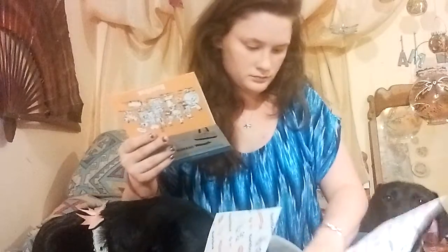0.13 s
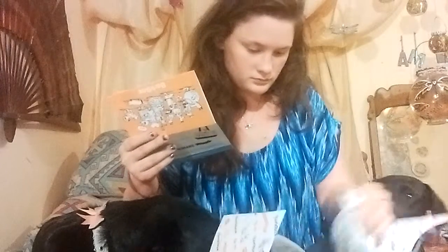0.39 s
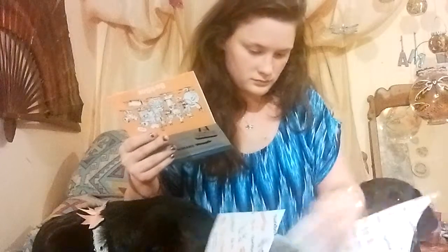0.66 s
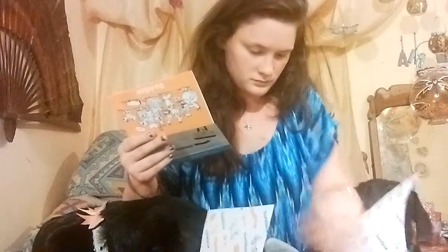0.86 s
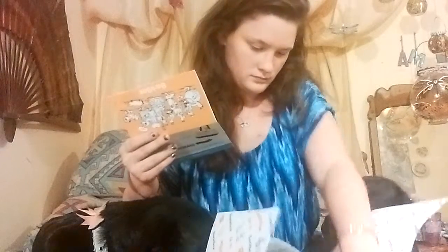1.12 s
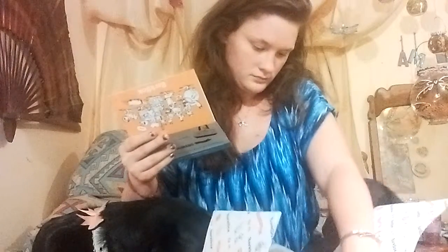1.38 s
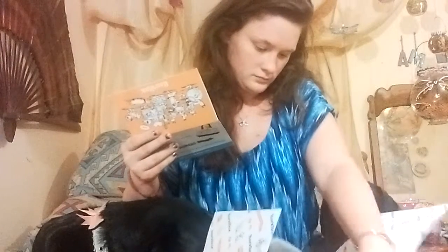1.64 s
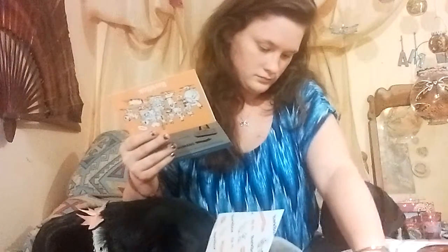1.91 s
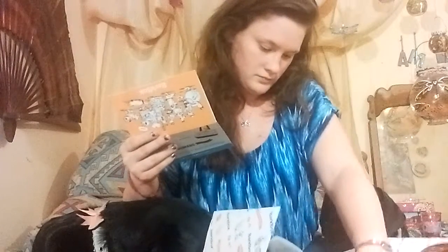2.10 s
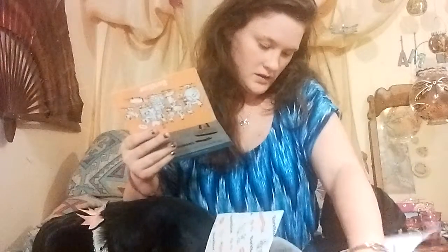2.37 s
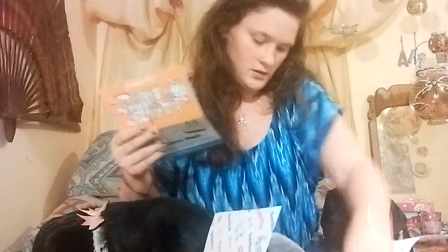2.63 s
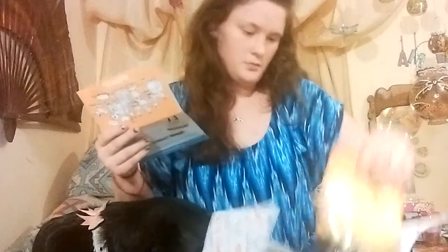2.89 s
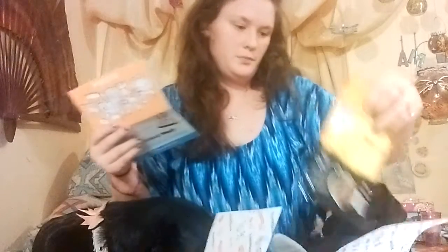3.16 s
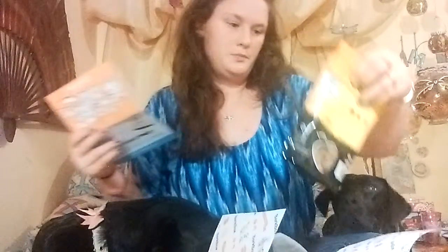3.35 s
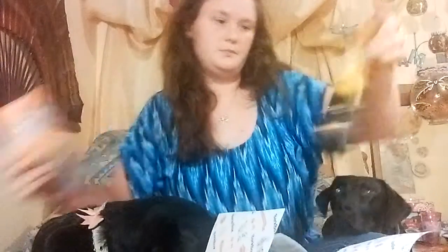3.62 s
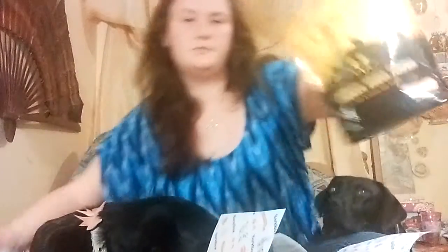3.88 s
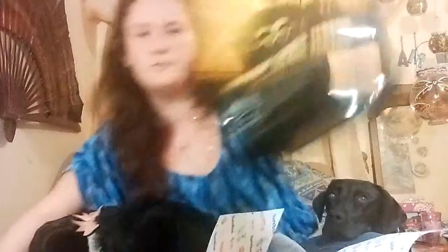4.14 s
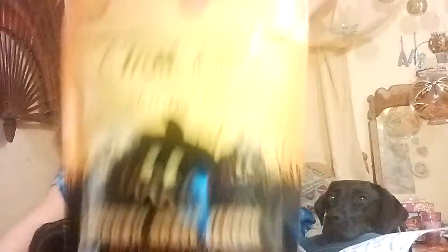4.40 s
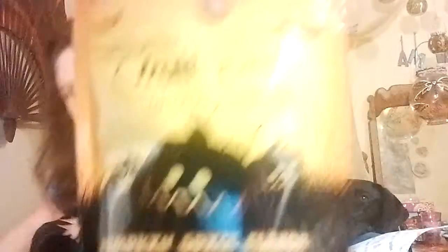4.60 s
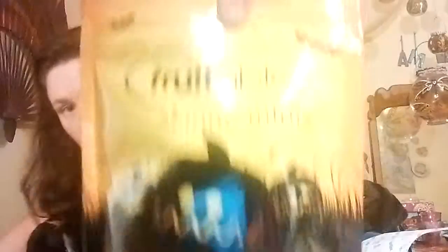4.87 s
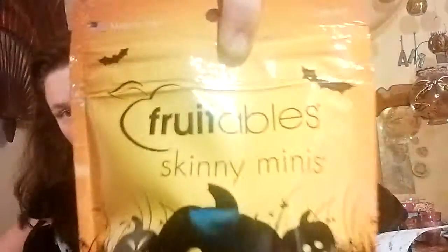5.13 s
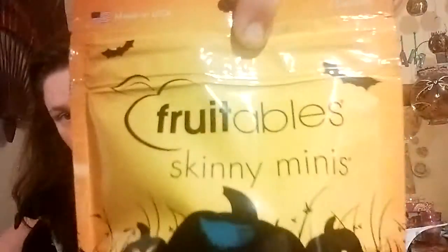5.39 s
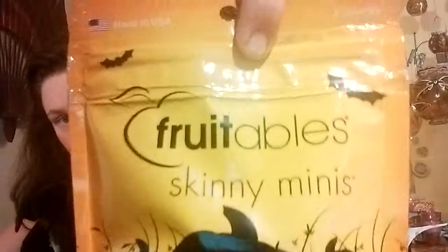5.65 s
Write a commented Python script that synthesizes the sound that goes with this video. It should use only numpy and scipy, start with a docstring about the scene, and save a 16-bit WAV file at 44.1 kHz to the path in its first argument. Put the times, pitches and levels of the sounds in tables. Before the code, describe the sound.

In a small, soft, quiet room, close to the microphone, stiff paper snaps and rustles as a hand rummages in a cardboard box. A sparser lull follows, then a dense crackle and dull thud as a plastic pouch is lifted out. A few sharp plastic clicks come later, then near silence with a throbbing low hum and a short airy hiss.

```python
"""Creases snap, singly and in dense rustles, as a hand rummages among stiff paper in a cardboard box, lifts out
a plastic pouch and turns it in a small soft room: band noise under burst envelopes, plus ringing facets and cracks.
The box answers with dull knocks from struck modes; a mains hum of low harmonics throbs below; a thin high hiss of
coloured noise with a faint whine comes near the end. A level-dependent gain makes quiet tails stop short."""
import sys
import numpy as np
from scipy import signal
from scipy.io import wavfile
from scipy.ndimage import uniform_filter1d

SR = 44100
rng = np.random.default_rng(int(sys.argv[2]) if len(sys.argv) > 2 else 0)


def store_wav(level_fs):
    """Save 16-bit WAV to argv[1]."""
    pcm = np.round(np.clip(np.atleast_2d(level_fs), -1, 1) * 32767)
    wavfile.write(sys.argv[1], SR, pcm.T.astype(np.int16))


def voltage_ratio(level):
    """Linear amplitude factor for a level in decibels (scalar or array-like)."""
    return 10 ** (np.asarray(level, float) / 20)


N = 253676

# centres of the knock, middle and treble zones of the handling sounds: f/Hz
ZONES_HZ = [500, 1600, 7000]
EDGES_HZ = 30 * 2 ** np.arange(0, 9.4, 1 / 3)   # third-octave bands
CENTRES_HZ = np.sqrt(EDGES_HZ[1:] * EDGES_HZ[:-1])


def rms_one(x):
    """Normalisation: a signal divided by its root mean square has unit power."""
    return x / np.sqrt(np.mean(x ** 2) + 1e-20)


def in_time(spans, silent_db=-120):
    """Linear interpolation of curve tables at every sample; the first column is silent between tables."""
    t = np.arange(N) / SR
    s, *columns = np.transpose([row for span in spans for row in span])
    columns = [np.interp(t, s, c) for c in columns]
    inside = sum((t >= span[0][0]) & (t <= span[-1][0]) for span in spans) > 0
    return [np.where(inside, columns[0], silent_db)] + columns[1:]


def at_hz(points, hz):
    """Spectral interpolation: a table is read on a log-frequency axis."""
    return np.interp(np.log(hz), np.log(np.array(points)[:, 0]), np.array(points)[:, 1])


def band(x, k):
    """Band-pass filtering: only third-octave band k is kept."""
    return signal.sosfilt(signal.butter(2, EDGES_HZ[k:k + 2], "band", fs=SR, output="sos"), x + 1e-18)


def drift(rate):
    """Slow random modulation: straight lines join normal draws of spread 1, rate of them per second."""
    steps = rng.standard_normal(int(N / SR * rate) + 2)
    return np.interp(np.arange(N) / SR * rate, np.arange(len(steps)), steps)


def dying(clicks, t60):
    """Exponential decay: a one-pole filter turns each click into an envelope."""
    return signal.lfilter([1], [1, -voltage_ratio(-60 / (t60 * SR))], clicks + 1e-18)


def random_ticks(per_s, spread_db):
    """Poisson-like excitation: clicks fall at random, a few much stronger than the rest."""
    strength_db = spread_db * np.minimum(rng.exponential(1, N), 4)
    return (rng.random(N) < per_s / SR) * voltage_ratio(strength_db)


def ring(clicks, hz, t60):
    """Modal resonance: a two-pole filter answers a unit click with a decaying sine of height 1."""
    r = voltage_ratio(-60 / (t60 * SR))
    w = 2 * np.pi * hz / SR
    return signal.lfilter([0, np.sin(w)], [1, -2 * r * np.cos(w), r * r], clicks + 1e-18)


def coloured(spectrum, patchy_db):
    """Filtered noise: white noise is shaped band by band, each band flickering on its own; rms 1."""
    white = rng.standard_normal((2, N))
    out = 0
    for k, hz in enumerate(CENTRES_HZ):
        gain = voltage_ratio(at_hz(spectrum, hz) + patchy_db * drift(60))
        out = out + gain * band(white[k % 2], k)   # neighbours use different noise
    return rms_one(out)


def in_zones(zones_db):
    """Spectral envelope: three zone levels are spread over all bands, then tilted."""
    # the middle hands over to the treble in a step between these two: f/Hz
    step_hz = [3700, 4700]
    # tilt shared by all handling noise: f/Hz, level/dB
    tilt = [(60, -33.5), (150, -19), (300, -11.5), (600, -4.5), (1500, -1.5), (3000, -1.5), (6000, -3.5),
            (9000, -9), (16000, -16.5)]
    treble_below, treble_above = 0.3, 0.96   # treble shares at the two ends of the step
    knock, middle, treble = np.eye(len(ZONES_HZ))
    below = (1 - treble_below) * middle + treble_below * treble
    above = (1 - treble_above) * middle + treble_above * treble
    shares = [knock, middle, below, above, treble]
    knots_hz = ZONES_HZ[:2] + step_hz + ZONES_HZ[2:]
    spread = np.transpose([np.interp(np.log(CENTRES_HZ), np.log(knots_hz), one) for one in np.transpose(shares)])
    return spread @ zones_db + at_hz(tilt, CENTRES_HZ)[:, None]


def snap_envelope(t, peak_db, t60):
    """Transient envelope: a short faint swell leads into each snap, which has a short hard head and then decays."""
    lead_db, lead_db_per_s = -18.5, 1494.5
    head_db, head_t60_s, head_follows = 1.5, 0.0038, 0.14   # louder bursts: harder heads, dB per dB over -20 dB
    rise_share = 0.047   # rise time as a share of t60
    rise = 1 - (1 - voltage_ratio(lead_db)) * np.exp(-t.clip(0) / (rise_share * t60))
    body = voltage_ratio(-60 * t / t60) * rise
    head = voltage_ratio(head_db + head_follows * (peak_db + 20) - 60 * t / head_t60_s)
    lead = voltage_ratio(lead_db + lead_db_per_s * t.clip(max=0))
    return np.where(t < 0, lead, body + head)


def scuff_envelope(t, t60, swell_s=0.0079):
    """Gradual onset: a scuff swells in a straight line before it dies."""
    fall = (t - swell_s).clip(0) ** 2 / (t60 * (t.clip(0) + swell_s))
    return (t / swell_s).clip(0, 1) * voltage_ratio(-60 * fall)


def snaps(per_s=1000.0, spread_db=4.0, tick_s=0.003, tick_share=0.56, scatter_db=3.0, box_db=-35.5):
    """Crackling noise: ticks over dense crackle follow burst and rustle envelopes; the low part rings box modes."""
    # Levels below are before the tilt and the scatter of the bands.
    # single bursts of creases: t/s, peak 1-3.5 kHz level/dB, knock 250-900 Hz level/dB,
    # treble 4-14 kHz level/dB, t60/s
    single_bursts = [(0.0014, -26.5, -48, -43, 0.053), (0.0157, -25, -42.5, -34, 0.048),
                     (0.0515, -26, -36.5, -33, 0.07), (0.0848, -35.5, -39, -42.5, 0.07),
                     (0.1063, -32, -41.5, -37, 0.07), (0.126, -21.5, -35, -26, 0.05),
                     (0.143, -9, -17, -15, 0.11), (0.2548, -39, -37, -73, 0.07),
                     (0.2879, -24, -36, -23.5, 0.09), (0.382, -21.5, -28.5, -24.5, 0.064),
                     (0.434, -23, -30, -24, 0.14), (0.4599, -18.5, -40, -23, 0.084),
                     (0.608, -43, -68, -58, 0.062), (0.686, -38.5, -55, -39.5, 0.2),
                     (0.718, -30, -51, -36.5, 0.1), (0.8023, -17, -32, -26.5, 0.19),
                     (0.8458, -18.5, -23.5, -40, 0.077), (0.8798, -25.5, -32.5, -51, 0.097),
                     (0.897, -23.5, -55, -42, 0.047), (0.9488, -31, -50.5, -75, 0.056),
                     (1.129, -78.5, -50.5, -51.5, 0.068), (1.2137, -32.5, -47.5, -56, 0.063),
                     (1.6485, -25.5, -28, -26, 0.085), (1.739, -28.5, -37.5, -39.5, 0.078),
                     (1.7705, -32.5, -39, -52, 0.07), (1.799, -16, -30.5, -22, 0.08),
                     (2.099, -40, -66, -78, 0.05), (2.174, -37.5, -46, -67, 0.053),
                     (2.417, -31, -47, -83, 0.084), (2.4777, -13.5, -27.5, -27.5, 0.089),
                     (2.516, -24, -45.5, -34, 0.048), (2.562, -27, -33, -47, 0.12),
                     (2.6205, -21.5, -68, -36, 0.059), (2.6564, -27, -45, -52, 0.07),
                     (2.6839, -17.5, -32, -44, 0.07), (2.709, -20, -34, -32, 0.09),
                     (2.7507, -21.5, -40, -22.5, 0.085), (2.7826, -30.5, -46.5, -27, 0.09),
                     (2.814, -32.5, -33.5, -56, 0.07), (2.8879, -19, -15.5, -52.5, 0.046),
                     (2.9196, -16.5, -32, -35.5, 0.1), (2.9342, -18.5, -30.5, -16, 0.086),
                     (2.949, -27, -9, -33, 0.071), (2.9759, -14.5, -16, -46, 0.07),
                     (2.9914, -17, -21, -27.5, 0.1), (3.0179, -19, -17.5, -21, 0.15),
                     (3.1134, -35.5, -53, -38.5, 0.07), (3.1386, -36, -50.5, -46.5, 0.055),
                     (3.6803, -20, -48, -17.5, 0.089), (3.9954, -20, -30, -25.5, 0.063),
                     (4.0985, -25, -38.5, -64, 0.03), (4.114, -27, -44.5, -51.5, 0.023),
                     (4.125, -26.5, -35.5, -42, 0.04), (4.15, -19.5, -37, -46, 0.023),
                     (4.1863, -17.5, -34, -24.5, 0.05), (4.29, -46, -63, -67, 0.12),
                     (4.3802, -32, -70, -45, 0.026), (4.4154, -47, -80.5, -66, 0.02),
                     (4.429, -87, -85, -49, 0.03), (4.6038, -38.5, -41, -51, 0.03),
                     (4.98, -51, -80.5, -94.5, 0.2), (5.223, -47.5, -80.5, -91, 0.049)]
    # softer scuffs, same columns: t/s, peak level/dB, knock level/dB, treble level/dB, t60/s
    soft_scuffs = [(1.303, -40.5, -47.5, -54.5, 0.028), (1.476, -39, -44.5, -64.5, 0.036),
                   (1.53, -35, -45, -55.5, 0.033), (1.594, -35.5, -37.5, -76, 0.032),
                   (2.029, -34.5, -40.5, -58, 0.12), (2.141, -43, -40.5, -66, 0.058),
                   (2.235, -38, -40.5, -48.5, 0.036), (3.835, -36, -65, -47.5, 0.041)]
    # steady rustle while the hand moves, one list per stretch: t/s, middle 1-3.5 kHz level/dB,
    # knock 250-900 Hz level/dB, treble 4-14 kHz level/dB
    rustle_curves = [
        [(0.0, -35.5, -40.5, -57), (0.142, -47, -50, -41), (0.31, -45, -44, -58), (0.37, -56, -70, -68),
         (0.44, -45, -44, -31), (0.5, -32, -63, -64)],
        [(0.5, -49, -41, -71), (0.548, -51.5, -64, -51.5), (0.63, -55.5, -73.5, -60), (0.67, -75, -77.5, -67),
         (0.804, -48, -41.5, -47.5), (0.98, -81, -84, -94)],
        [(1.1, -72, -79.5, -87.5), (1.194, -99.5, -60, -80), (1.5, -93.5, -65, -87.5)],
        [(1.5, -80, -67, -90), (1.554, -96, -75, -61), (1.666, -67, -60, -70), (1.856, -74.5, -43, -70),
         (1.95, -102, -73, -69)],
        [(1.95, -94, -59, -78.5), (2.112, -101, -86, -67), (2.3, -60, -75.5, -67), (2.4, -98, -70, -70.5)],
        [(2.46, -49, -57, -76), (2.524, -55, -76, -71), (2.646, -41.5, -56, -59), (2.894, -47.5, -42.5, -58.5),
         (2.97, -33, -36, -66), (3.17, -90, -79, -82)],
    ]
    # modes of the box: f/Hz, relative level/dB, t60/s
    box_modes = [(278, -16.5, 0.089), (410, 0, 0.08), (563.2, 5.5, 0.15), (800, -4, 0.019),
                 (1037, -2.5, 0.033)]
    crest_db, clump_db = 8.5, 5   # burst peak over rms; spread of the rustle's clumping

    power = np.zeros((len(CENTRES_HZ), N + SR))
    middle_db, knock_db, treble_db = in_time(rustle_curves)
    moving = (middle_db > -119) * voltage_ratio(clump_db * drift(45))
    power[:, :N] = (moving * voltage_ratio(in_zones([knock_db, middle_db, treble_db]))) ** 2

    t = np.arange(-SR // 20, int(SR * .3)) / SR   # from 0.05 s before each burst
    for k, (s, peak_db, knock_db, treble_db, t60) in enumerate(single_bursts + soft_scuffs):
        at = round((s + t[0]) * SR)
        colour_db = in_zones([[knock_db], [peak_db - crest_db], [treble_db]])[:, 0]
        colour_db = colour_db + scatter_db * rng.standard_normal(len(CENTRES_HZ))
        if k < len(single_bursts):
            shape = snap_envelope(t, peak_db, t60)
        else:
            shape = scuff_envelope(t, t60)
        shape = shape[max(-at, 0):]
        power[:, max(at, 0):at + len(t)] += np.outer(voltage_ratio(colour_db), shape) ** 2

    ticks = rms_one(dying(random_ticks(per_s, spread_db), tick_s))
    grit = np.sqrt(1 - tick_share + tick_share * ticks ** 2)
    drive = rng.standard_normal((2, N)) * grit
    burst = 0
    for k, hz in enumerate(CENTRES_HZ):
        even = np.sqrt(.36 * SR / hz)   # evens out the band widths
        burst = burst + band(drive[k % 2] * np.sqrt(power[k, :N]), k) * even
    knock = drive[0] * np.sqrt(power[np.searchsorted(CENTRES_HZ, ZONES_HZ[0]), :N])
    box = sum(voltage_ratio(box_db + mode_db) * ring(knock, hz, t60) for hz, mode_db, t60 in box_modes)
    return burst + facets(power) + box


def facets(power, per_s=3500.0, cycles=37.0, spread_db=3.5, level_db=-4.5):
    """Plate resonance: each tick rings one flat facet between the creases, at a pitch of its own."""
    ticks = random_ticks(per_s, spread_db)
    pitches = np.geomspace(400, 9000, 40) * (1 + .03 * rng.standard_normal(40))
    dealt = rng.integers(0, 40, N)   # which facet a tick strikes
    out = 0
    for k, hz in enumerate(pitches):
        strength = np.sqrt(power[np.searchsorted(EDGES_HZ, hz) - 1, :N])
        out = out + ring(ticks * (dealt == k) * strength, hz, cycles / hz) * np.sqrt(hz / 2000)
    return voltage_ratio(level_db) * out


def room(x, wet_db=-8.5, cut_s=0.066, rise_s=0.00064, trace_db=-8.0):
    """Diffuse reverberation: noise in each band follows the sound's power, dies away and soon drops to a trace."""
    # reverberation time: f/Hz, t60/s
    reverb_times = [(200, 0.048), (1000, 0.22), (4000, 0.26), (12000, 0.079)]
    white, out = rng.standard_normal((2, N)), 0
    t = np.arange(SR // 5) / SR
    for k, hz in enumerate(CENTRES_HZ):
        decay = voltage_ratio(-120 * t / at_hz(reverb_times, hz))   # of power, hence the doubled 60 dB
        decay = decay * np.clip(1.5 - t / cut_s, voltage_ratio(2 * trace_db), 1) * (1 - np.exp(-t / rise_s))
        power = signal.fftconvolve(band(x, k) ** 2, decay / decay.sum())[:N]
        out = out + np.sqrt(power.clip(0)) * rms_one(band(white[k % 2], k))
    return voltage_ratio(wet_db) * out


def gate(x, low_db=-63.5, middle_db=-60.5, treble_db=-62.0, slope=0.92, depth_db=13.0, window_s=0.0042):
    """Downward expansion: the recorder's suppressor pushes down what falls under a threshold in each of three bands."""
    low = signal.sosfiltfilt(signal.butter(2, 1000, fs=SR, output="sos"), x)
    treble = signal.sosfiltfilt(signal.butter(2, 4000, "high", fs=SR, output="sos"), x)
    out = 0
    for part, threshold_db in ((low, low_db), (x - low - treble, middle_db), (treble, treble_db)):
        level_db = 10 * np.log10(uniform_filter1d(part ** 2, int(window_s * SR)).clip(1e-14))
        out = out + part * voltage_ratio(-np.clip(slope * (threshold_db - level_db), 0, depth_db))
    return out


def suppressor(x, open_db=8.5, threshold_db=-58.0, window_s=0.06):
    """Level-dependent gain: the background opens a little while handling is loud."""
    level_db = 10 * np.log10(uniform_filter1d(x ** 2, int(window_s * SR)).clip(1e-14))
    return voltage_ratio(open_db / (1 + np.exp((threshold_db - level_db) / 6.4)))


def background(handled, floor_db=-76):
    """Stationary noise floor: coloured noise under the suppressor's gain."""
    # spectral density of the floor: f/Hz, relative level/dB per Hz
    floor_colour = [(15, -27), (25, 0), (53, -29.5), (123, -12), (195, -18.5), (427, -17), (4030, -31.5),
                    (9570, -30), (16000, -34)]
    return voltage_ratio(floor_db) * coloured(floor_colour, patchy_db=2.0) * suppressor(handled)


def hum(before_db=-70.5, before_half_s=0.026, after_s=0.066, after_db=-64.5, swell_s=0.0067,
        rest_db=-81.0, buzz_db=-28.5, rumble_db=-24.5):
    """Amplitude modulation: a tone near twice the mains rate throbs, with weak swells before and after each throb."""
    # one row per throb: level/dB, half length/s
    throbs = [(-51.5, 0.019), (-52, 0.022), (-52, 0.044), (-49, 0.026), (-55.5, 0.047), (-59, .03),
              (-58, 0.024), (-52, 0.049), (-48, 0.029), (-56, 0.051), (-53, 0.028), (-52, 0.018),
              (-53.5, 0.049), (-52.5, 0.023), (-56.5, 0.037), (-52, 0.025), (-61, 0.029)]
    hum_hz, first_s, period_s = 121.3, .24, .3283
    before_s = .115   # lead of the weak swell
    t = np.arange(N) / SR
    level = voltage_ratio(rest_db)
    for k, (throb_db, half_s) in enumerate(throbs + throbs[-1:]):   # the last throb comes twice
        s = first_s + k * period_s
        level = level + voltage_ratio(throb_db) * np.exp(-np.abs((t - s) / half_s) ** 3)
        level = level + voltage_ratio(before_db) * np.exp(-((t - s + before_s) / before_half_s) ** 2)
        level = level + voltage_ratio(after_db) * np.exp(-((t - s - after_s) / swell_s) ** 2)
    phase = 2 * np.pi * np.cumsum(hum_hz + 1.7 * drift(25)) / SR
    low_pass = signal.butter(2, 300.0, fs=SR, output="sos")
    rumble = rms_one(signal.sosfilt(low_pass, rng.standard_normal(N)))
    buzz = np.sin(2 * phase) + np.sin(3 * phase)
    tone = np.sin(phase) + voltage_ratio(buzz_db) * buzz + voltage_ratio(rumble_db) * rumble
    return np.sqrt(2) * level * voltage_ratio(1.5 * drift(30)) * tone


def cracks(cycles=15.0, level_db=-2.0, flip_s=.0016, rise_cycles=0.6):
    """Snap-through buckling: a stiff crease flips within a cycle and rings for a few cycles."""
    # sharp cracks, loud and faint, sometimes several pitches at once:
    # t/s, level/dB (before the common level and the rise), f/Hz
    sharp_cracks = [(0.083, -18.5, 1160), (0.143, -2.5, 1820), (0.145, -2.5, 566), (0.146, -7.5, 4380),
                    (0.16, -13.5, 626), (0.381, -16, 1410), (0.466, -17, 1800), (1.313, -27, 2750),
                    (1.32, -28, 2880), (1.54, -20.5, 4540), (1.601, -26, 1290), (1.646, -17, 1190),
                    (1.797, -11.5, 576), (1.807, -4, 3380), (2.481, -10.5, 2190), (2.487, -10, 2400),
                    (2.573, -27, 1500), (2.595, -23, 1230), (2.62, -18.5, 2010), (2.627, -16, 4930),
                    (2.684, -15.5, 2420), (2.692, -16, 2560), (2.716, -12.5, 3470), (2.743, -17.5, 1615),
                    (2.758, -11.5, 5800), (2.783, -14, 5200), (2.818, -19, 971), (2.826, -18, 954.6),
                    (2.887, -10, 592), (2.934, -7, 7485), (2.934, -9, 12050), (2.934, -8.5, 4500),
                    (2.975, -0.5, 940), (2.975, -5.5, 1598), (2.993, -6, 556), (3.678, -12, 5250),
                    (3.996, -21, 1590), (4.098, -17.5, 1760), (4.113, -19, 1490), (4.149, -19.5, 3260),
                    (4.184, -3.5, 3730), (4.188, -9.5, 2810), (4.375, -33.5, 1690), (4.381, -31, 4810),
                    (4.604, -33, 1900)]
    out, n = np.zeros(N), np.arange(2000)
    for s, peak_db, hz in sharp_cracks:
        at = round((s + flip_s) * SR)   # each crack sounds flip_s after its listed time
        click = voltage_ratio(peak_db + level_db) * (n == 0)
        rise = 1 - np.exp(-n * hz / SR / rise_cycles)
        out[at:at + 2000] += ring(click, hz, cycles / hz) * rise
    return out


def thump():
    """Impact excitation: rounded pushes drive the low panel modes, a longer contact duller; one deep thud is the drop."""
    # soft blows of the hand on the cardboard: t/s, level/dB (of the push), contact/s
    blows = [(0.449, -34.5, 0.00029), (1.217, -36.5, 0.00042), (1.268, -43, 0.0011),
             (1.419, -52.5, 0.00081), (1.541, -41.5, 0.0012), (1.656, -47, 0.00063),
             (1.862, -35.5, 0.00018), (2.956, -21.5, 0.00039), (3, -22.5, 0.00066)]
    # modes of the panel: f/Hz, relative level/dB, t60/s
    panel_modes = [(153, -12, 0.096), (194, 0, 0.07), (265, -4, 0.11), (480, -3, .07)]
    drop_s, drop_db, drop_hz, drop_t60_s = 2.97, -29, 79, 0.36   # the box drops back on the bedding
    t, pushes = np.arange(N) / SR, 0
    for s, peak_db, contact_s in blows:
        push = np.exp(-((t - s) / contact_s) ** 2)
        pushes = pushes + voltage_ratio(peak_db) * push / push.sum()
    panel = sum(voltage_ratio(mode_db) * ring(pushes, hz, t60) for hz, mode_db, t60 in panel_modes)
    push = np.exp(-((t - drop_s) * 4.7 * drop_hz) ** 2)
    panel = panel + ring(voltage_ratio(drop_db) * push / push.sum(), drop_hz, drop_t60_s)
    return signal.sosfilt(signal.butter(4, 55.0, "high", fs=SR, output="sos"), panel)


def hiss():
    """Turbulent flow noise: air through a narrow gap, perhaps a dog sniffing, with a faint harmonic whine."""
    # course of the hiss, one list per stretch: t/s, level/dB
    hiss_curves = [
        [(4.915, -77.5), (5.05, -79.5), (5.08, -93)],
        [(5.28, -96), (5.418, -51.5), (5.455, -55.5), (5.482, -48.5), (5.75, -96.5)],
    ]
    # spectral density of the hiss: f/Hz, relative level/dB per Hz
    hiss_colour = [(4500, -35.5), (6120, -31), (7900, -16), (10100, 4.5), (16000, -21)]
    # a faint, mostly falling whine: t/s, f/Hz, level/dB
    whine_curve = [(5.44, 742, -84.5), (5.478, 566, -70), (5.631, 586, -79.5)]
    # harmonics of the whine from the first up: relative level/dB
    partials_db = [0, -14, -18, -16]
    whine_db, hz = in_time([[(s, level, pitch) for s, pitch, level in whine_curve]])
    turns = np.cumsum(hz * (1 + .06 * drift(150))) / SR
    harmonics = sum(voltage_ratio(partial_db) * np.sin(2 * np.pi * (k + 1) * turns)
                    for k, partial_db in enumerate(partials_db))
    whine = np.sqrt(2) * voltage_ratio(whine_db + 5.2 * drift(50)) * harmonics
    return voltage_ratio(in_time(hiss_curves)[0]) * coloured(hiss_colour, patchy_db=5.0) + whine


def scene():
    """Superposition: handling sounds with their room, then the steady and faint sounds."""
    handled = snaps() + cracks()
    high_pass = signal.butter(4, 110.0, "high", fs=SR, output="sos")
    near = signal.sosfilt(high_pass, handled + room(handled))
    return (gate(near) + thump() + hum() + hiss() + background(handled))[None]


def roll_off(x):
    """The treble ends steeply here."""
    return signal.sosfilt(signal.butter(12, 16490, fs=SR, output="sos"), x)


def record(dry):
    """Linear filtering: the microphone has a dip in the lower treble, and the top is cut."""
    dip_hz, dip_q, dip_share = 4750, 6.1, 0.19
    dry = dry - dip_share * signal.lfilter(*signal.iirpeak(dip_hz, dip_q, fs=SR), dry)
    mix = signal.sosfilt(signal.cheby2(12, 50, 16300, fs=SR, output="sos"), dry)
    return roll_off(mix)


dry = scene()
out = record(dry)
store_wav(out)
```